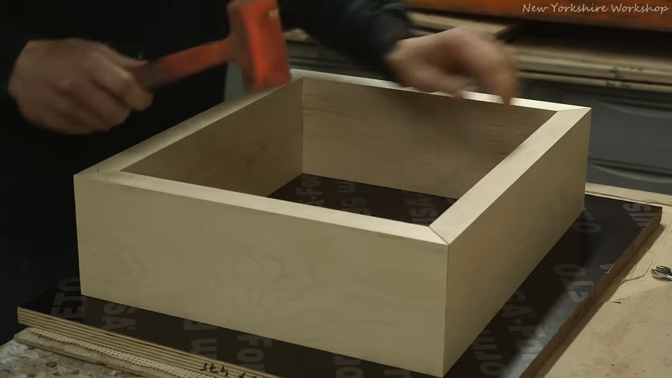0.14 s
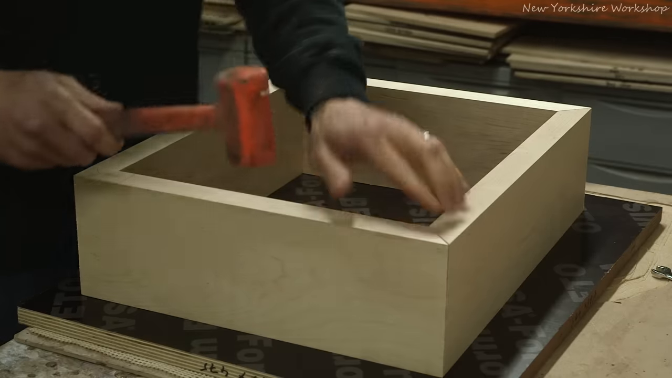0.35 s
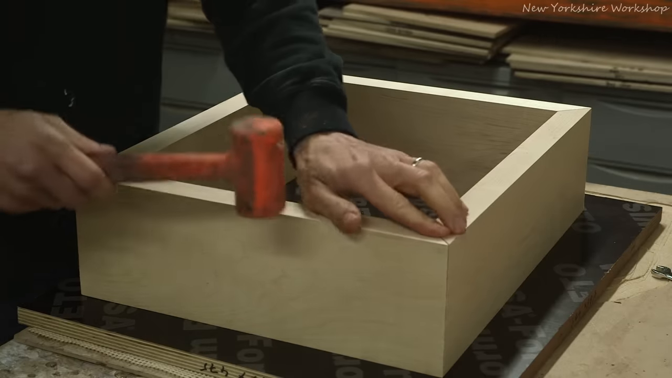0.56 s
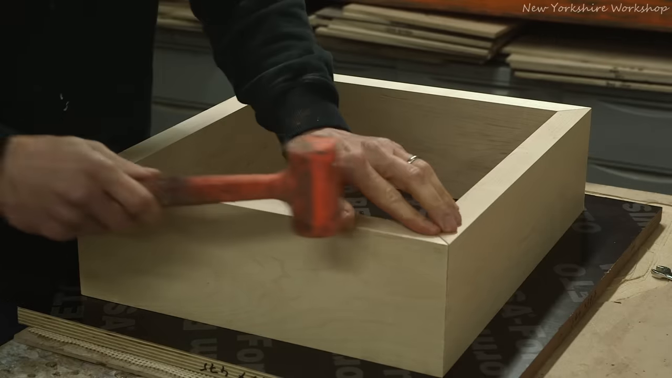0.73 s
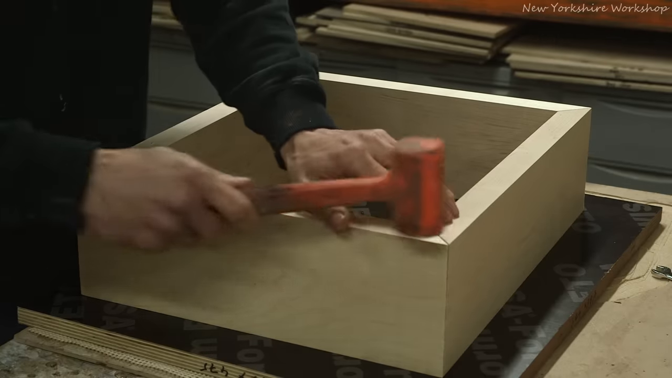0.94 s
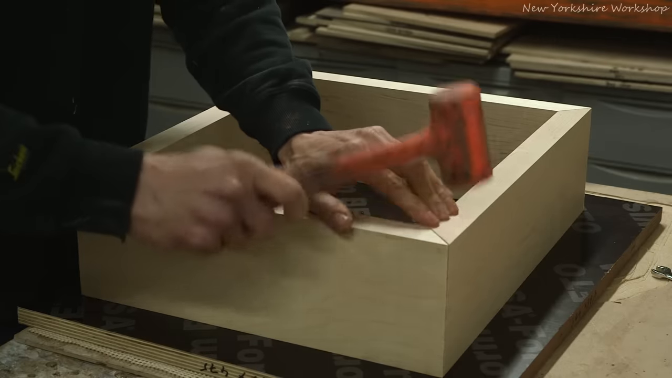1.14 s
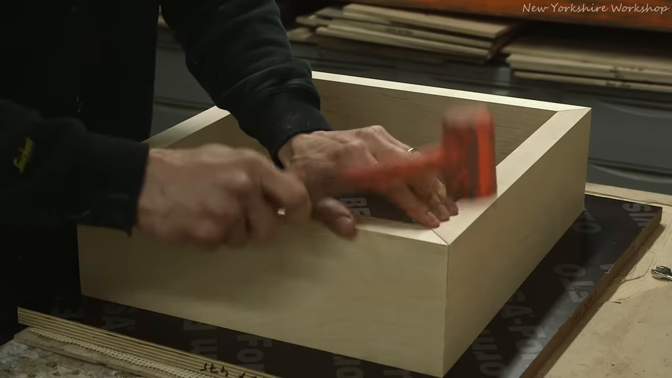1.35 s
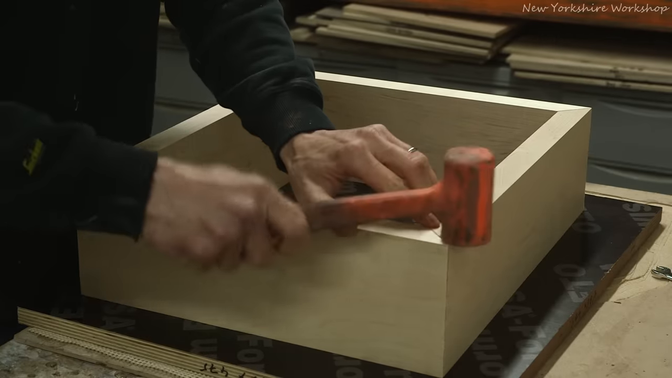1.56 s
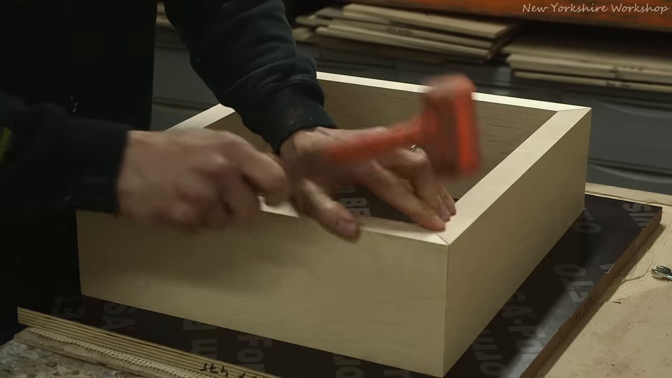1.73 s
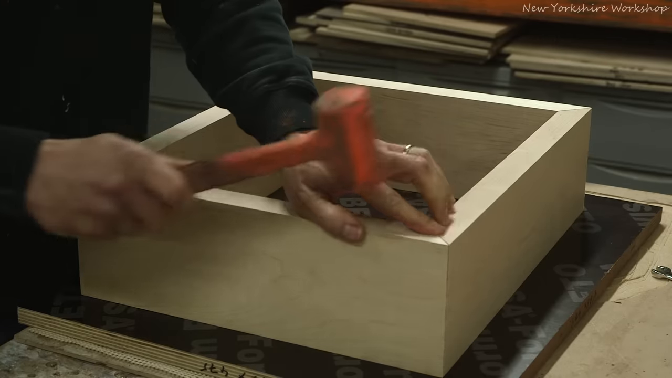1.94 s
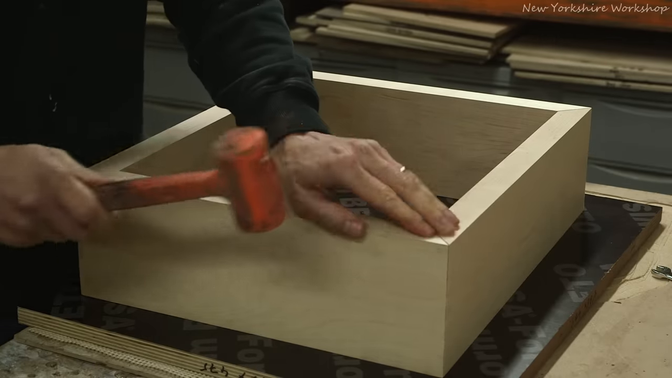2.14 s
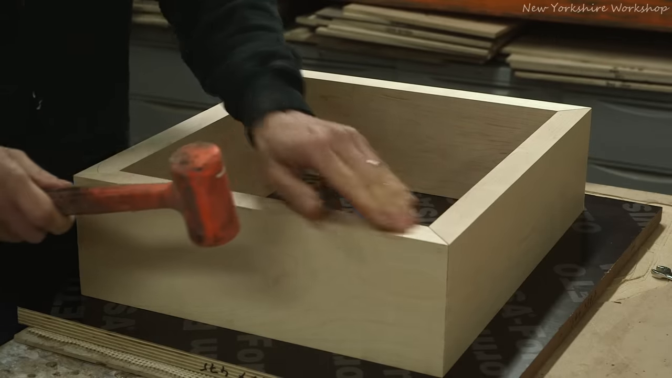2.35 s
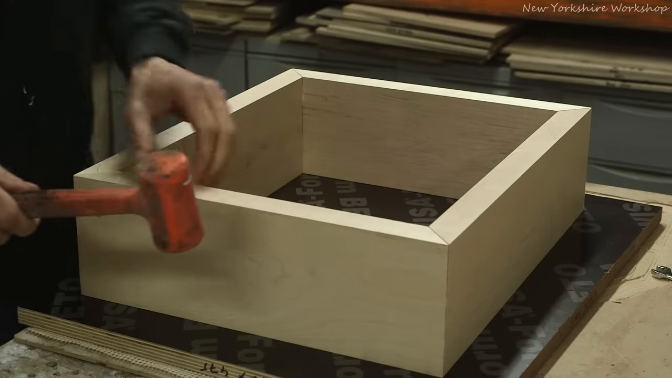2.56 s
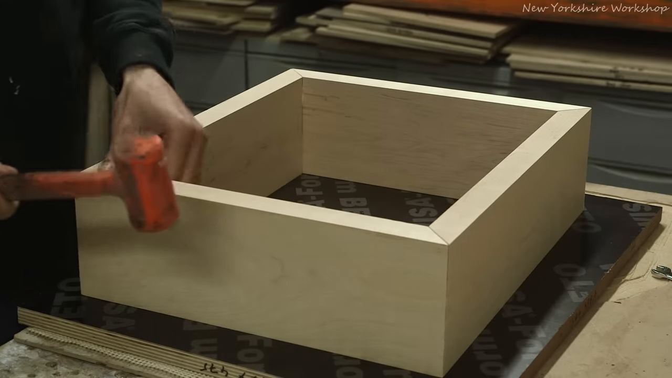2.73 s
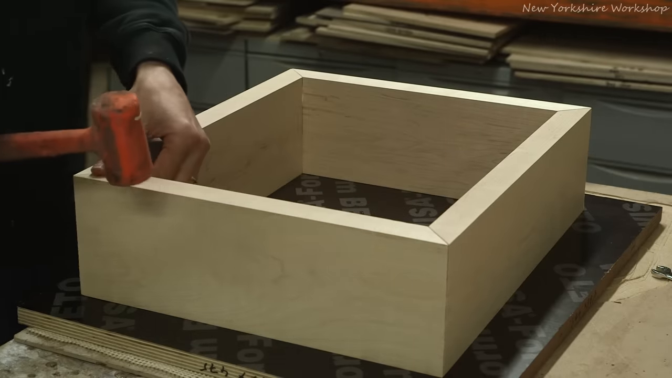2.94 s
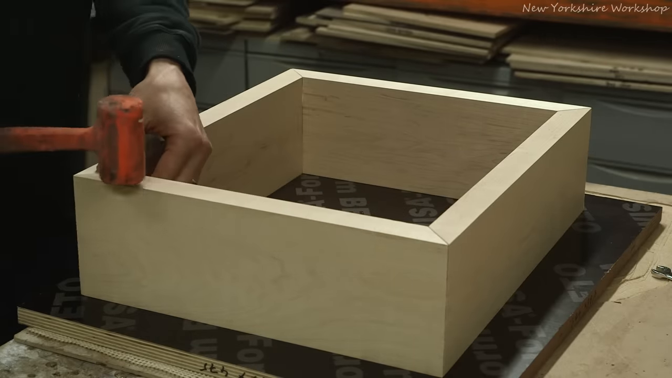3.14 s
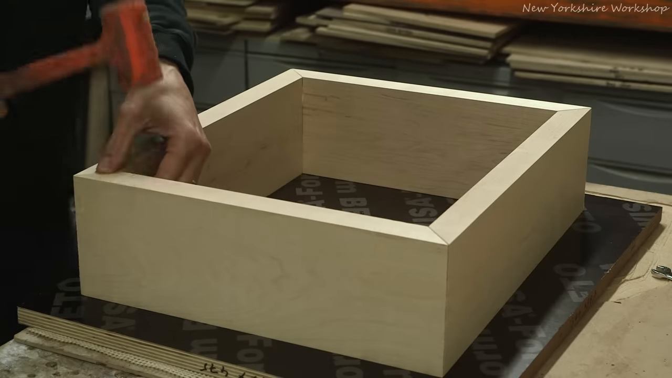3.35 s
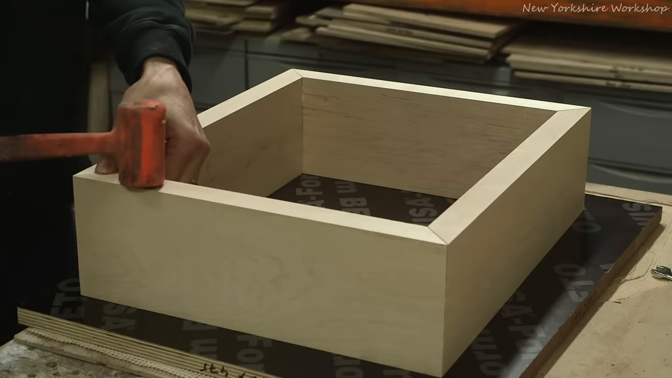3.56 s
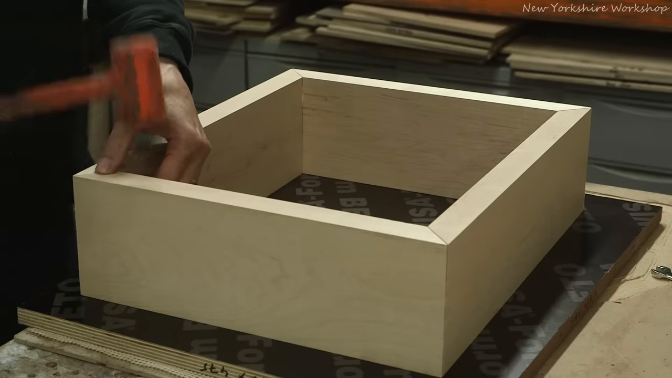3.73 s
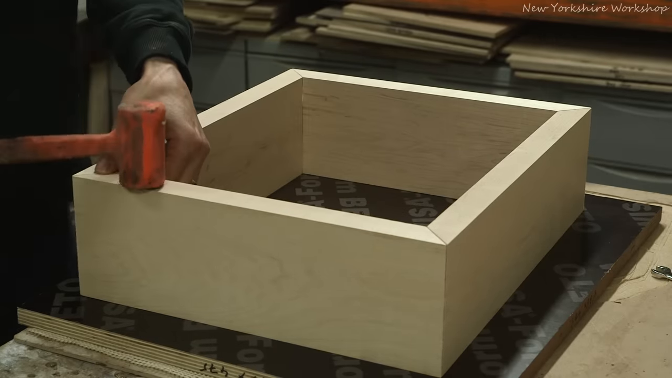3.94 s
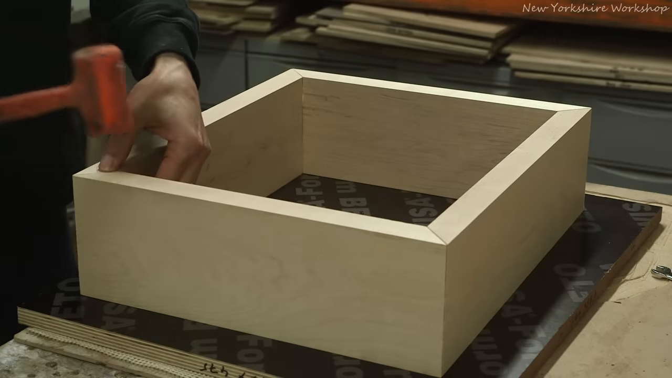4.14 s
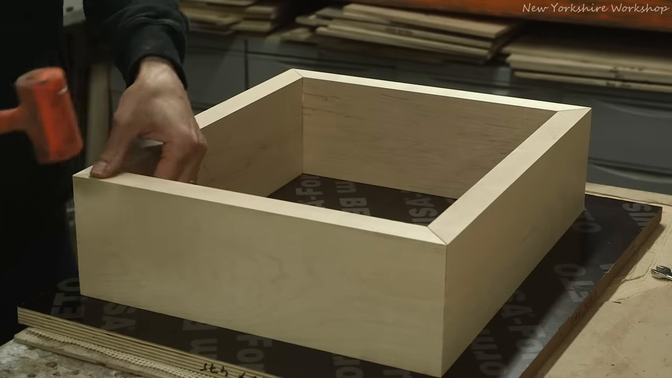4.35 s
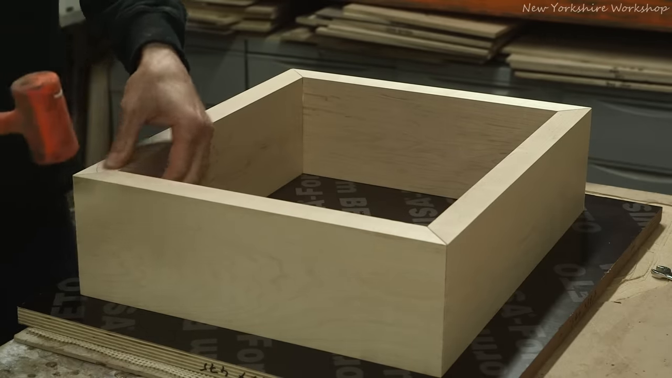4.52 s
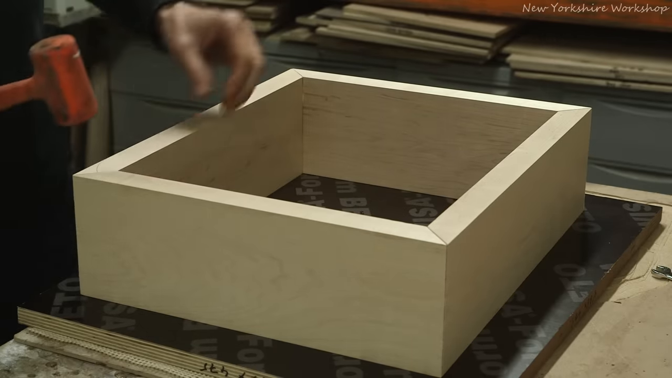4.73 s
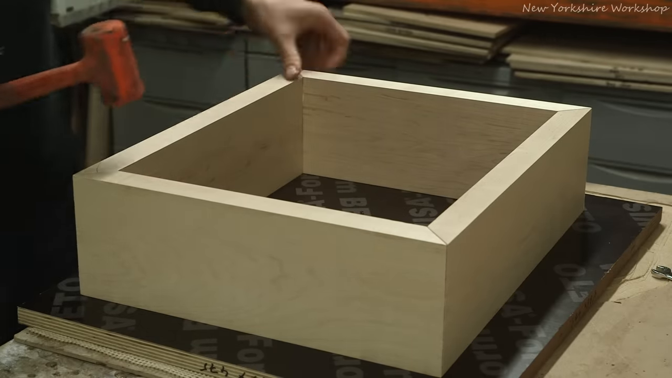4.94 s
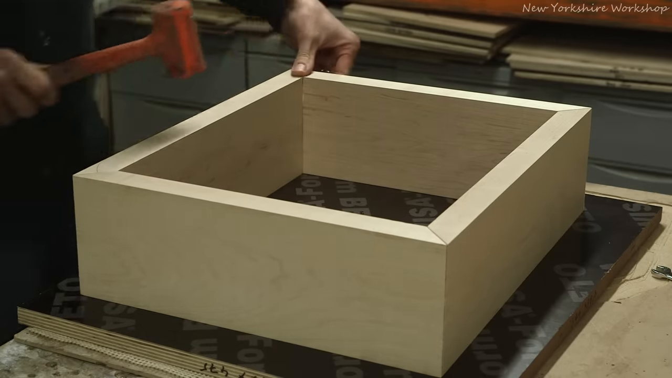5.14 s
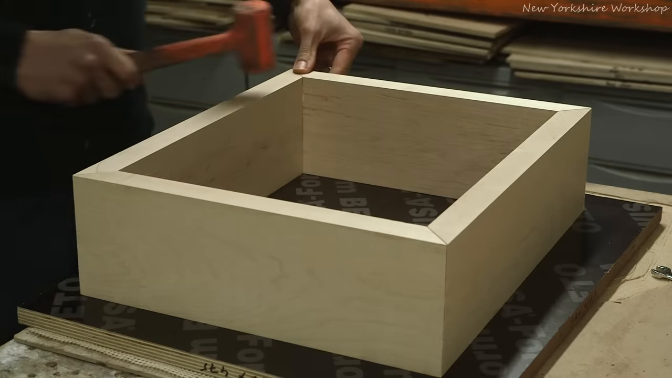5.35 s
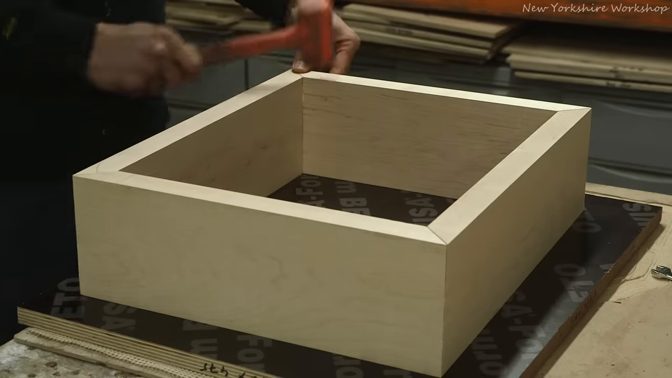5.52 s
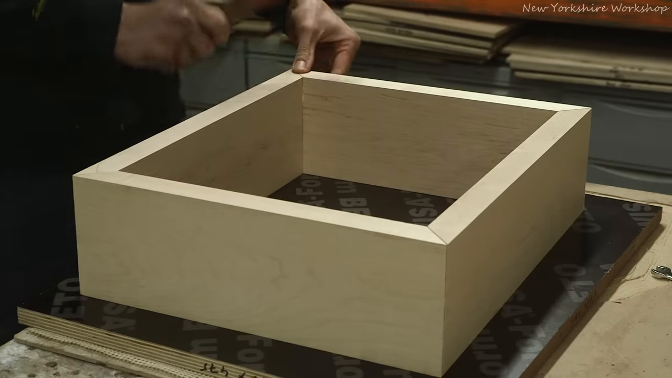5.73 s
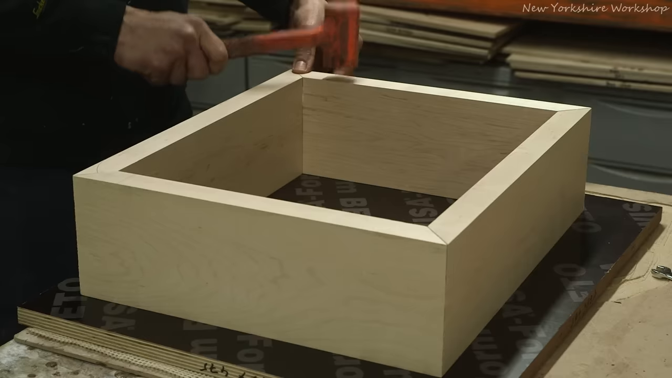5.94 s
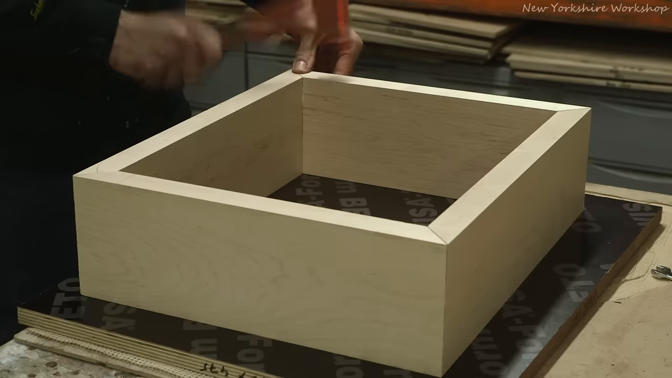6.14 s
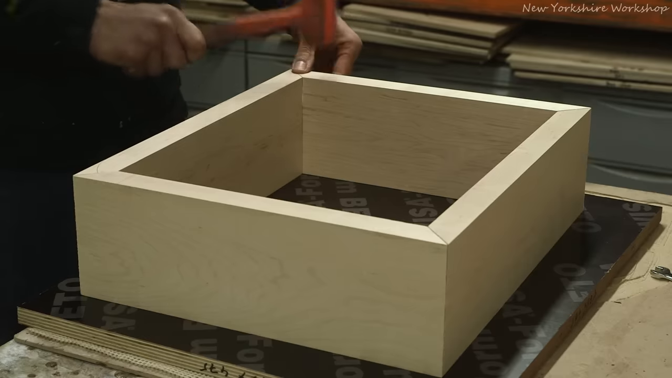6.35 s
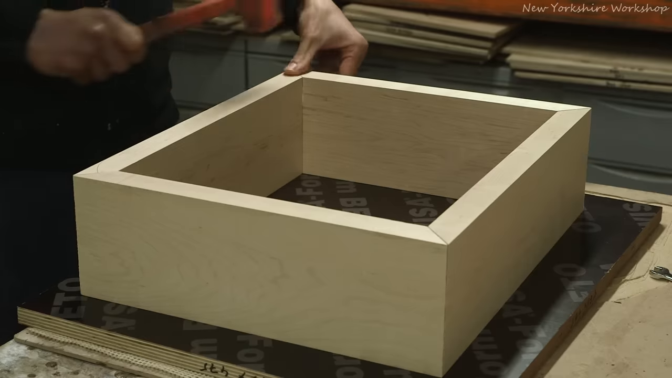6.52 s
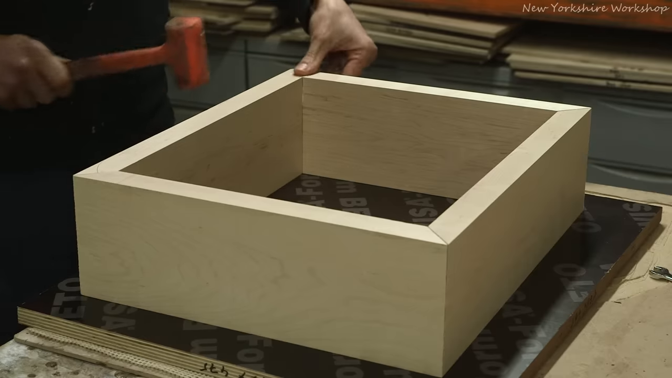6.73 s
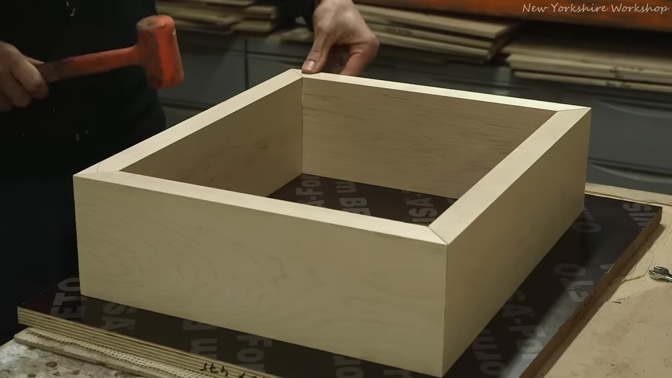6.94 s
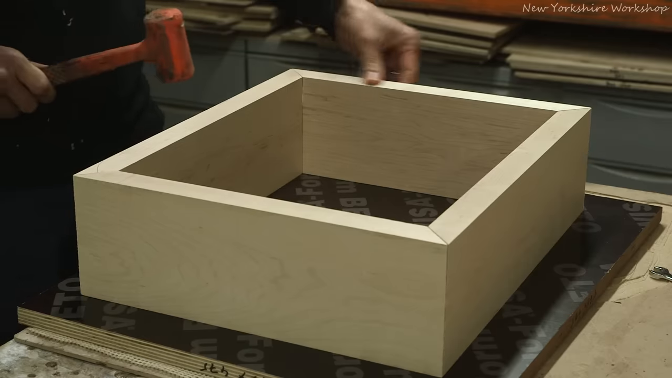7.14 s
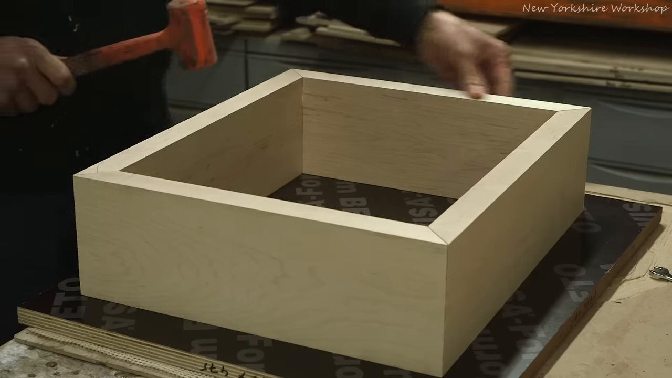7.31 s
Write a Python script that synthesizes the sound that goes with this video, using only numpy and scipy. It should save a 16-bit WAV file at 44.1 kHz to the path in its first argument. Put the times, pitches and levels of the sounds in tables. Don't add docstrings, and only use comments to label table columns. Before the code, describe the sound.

Close-up woodworking: faint cloth brushing and loose shot sliding in a mallet head, then two knocks on a wooden box, the first muted. Sleeves rustle and fingertips softly rub the edge before a second pair of hard knocks and, after another pause, a third. Each knock is brief, woody and hollow with a short indoor tail. It ends with light finger contact and fabric rubbing over quiet room tone and distant hum.

```python
import sys
import numpy as np
from scipy import signal
from scipy.fft import rfft, irfft
from scipy.io import wavfile
from scipy.ndimage import uniform_filter1d

SR = 44100
rng = np.random.default_rng(int(sys.argv[2]) if len(sys.argv) > 2 else 0)


def pcm_store(signal):
    levels = np.round(np.clip(np.atleast_2d(signal), -1, 1) * 32767)
    wavfile.write(sys.argv[1], SR, levels.astype(np.int16).T)


def gain_from_decibels(decibels):
    exponent = np.asarray(decibels, float) / 20
    return 10 ** exponent


N = 329861
TIME = np.arange(N) / SR
LEFT_RIGHT = np.array([[1], [-1]])


def along(table, hz, column=1):
    rows = np.array(table, float)
    return np.interp(np.log(np.maximum(hz, 1)), np.log(rows[:, 0]), rows[:, column])


def colour(x, table):
    log_gain = along(table, np.linspace(0, SR / 2, 2049)) * np.log(10) / 20
    cepstrum = irfft(log_gain)
    cepstrum[1:2048] *= 2
    cepstrum[2049:] = 0
    impulse = irfft(np.exp(rfft(cepstrum)))
    return signal.fftconvolve(x, impulse)[:len(x)]


def unit(x):
    return x / np.sqrt(np.mean(x ** 2))


def butter(order, hz, kind, x):
    return signal.sosfilt(signal.butter(order, hz, kind, fs=SR, output="sos"), x)


def ring(x, modes, widen=0.67):
    total = 0
    for k, (hz, width_hz, db) in enumerate(modes):
        q = hz / max(widen * width_hz, 3)
        total = total + (-1) ** k * gain_from_decibels(db) * signal.lfilter(*signal.iirpeak(hz, q, SR), x)
    return total


def envelope(strokes, sag_db_s=0):
    gain = np.zeros(N)
    for s, db, rise_s, hold_s, fall_s in strokes:
        away = np.maximum(s - TIME, 0) / rise_s + np.maximum(TIME - s - hold_s, 0) / fall_s
        gain += gain_from_decibels(db - 20 * away + sag_db_s * np.clip(TIME - s, 0, hold_s))
    return gain


def grains(rate_hz, spread_db):
    hit = rng.random(N) < rate_hz / SR
    return hit * rng.standard_normal(N) * gain_from_decibels(spread_db * rng.exponential(size=N))


def clatter(shape):
    x = rng.standard_normal(len(shape)) * shape
    for _ in range(8):
        lines = rfft(x)
        x = irfft(lines / (np.abs(lines) + 1e-12), len(shape))
        x *= shape / np.sqrt(np.abs(uniform_filter1d(x ** 2, size=40)) + 1e-12)
    return unit(x)


def workshop(x):
    # frequency in Hz, T60 in s, level in dB, side share.
    room = [(59.7, 0.63, 1, .05), (162, .65, 1, .05), (330, 0.46, 4, .06), (650, 0.48, 5, 0.12),
            (990, 0.48, 2.5, 0.31), (1960, .45, -1, 0.34), (3500, 0.42, -0.5, 0.47), (6070, 0.3, -0.5, .5),
            (8500, .26, 1.5, .5), (11700, 0.2, 0, .6)]
    late_db, late_stretch = -21.5, 1.9
    t, mid, side = TIME[:SR], 0, 0
    for hz in 45 * 2 ** np.arange(0, 8.6, .5):
        fall_db = 60 * t / along(room, hz)
        decay = gain_from_decibels(-fall_db) + gain_from_decibels(late_db - fall_db / late_stretch)
        fade = gain_from_decibels(along(room, hz, column=2)) * decay * np.clip(t / 0.0013, 0, 1)
        noise = butter(2, [hz / 2 ** .25, hz * 2 ** 0.28], "band", rng.standard_normal((2, SR))) * fade
        mid = mid + noise[0]
        side = side + noise[1] * along(room, hz, column=3)
    response = np.array([mid + side, mid - side]) / np.sqrt(SR * 0.049)
    return signal.fftconvolve(x[None], response, axes=1)[:, :N]


def air():
    # frequency in Hz, density in dB per Hz.
    tone = [(12, -20), (20, -5.5), (32, -16), (98, -4.5), (123, -15), (150, -7), (234, -9), (301, -9),
            (409, -14.5), (445, -20.5), (526, -13), (572, -15.5), (1570, -21), (1960, -27), (15900, -49.5)]
    # frequency in Hz, side minus mid in dB.
    tone_side = [(60, -18.5), (110, -12.5), (200, -12), (380, -15), (700, -8.5), (1290, -6.5), (2380, -3),
                 (4400, 2.5), (8120, -2), (15000, -1)]
    # frequency in Hz, width in Hz, level in dB.
    fan = [(286, 44, -68), (310, 17, -79.5), (306, 12, -84.5), (1500, 85, -81)]
    mid, side = colour(rng.standard_normal(N), tone), colour(rng.standard_normal(N), tone)
    gain = gain_from_decibels(-64.5 - 1.5) / np.std(mid)
    hum = 0
    for hz, width_hz, db in fan:
        hum = hum + gain_from_decibels(db) * unit(ring(rng.standard_normal(N), [(hz, width_hz, 0)]))
    return gain * (mid + colour(side, tone_side) * LEFT_RIGHT) + hum


def sleeves():
    # time of full level in s, level in dB, rise, hold and fall in s.
    brushes = [(0.10, -85, 0.064, 0.0079, .15), (0.42, -85, 0.077, .03, 0.067),
               (2.17, -84.5, .2, 0.0094, 0.044), (2.30, -77, .08, .01, 0.058), (2.39, -83, .06, .01, 0.035),
               (2.53, -81, .09, .01, 0.082), (4.55, -89, .08, .04, .02), (5.14, -81, .04, .02, .1),
               (7.08, -79.5, 0.27, 0.19, 0.24), (7.31, -79.5, 0.038, .09, 0.398)]
    # frequency in Hz, density in dB per Hz.
    cloth = [(1180, -45), (2000, 0.5), (4150, 0.5), (5770, 1), (7550, -3), (11300, -4), (15900, -16.5)]
    return unit(colour(grains(9000, 1.8), cloth)) * envelope(brushes) * gain_from_decibels(5.0)


def fingertips():
    # start in s, length in s, level in dB.
    rubs = [(2.703, .06, -88.5), (2.822, .07, -82.5), (2.946, .21, -87.5), (4.23, 0.1084, -84.5),
            (4.40, 0.16, -87.5), (5.11, 0.3, -88), (6.645, 0.214, -85)]
    # frequency in Hz, width in Hz, level in dB.
    veneer = [(2400, 88, 5.5), (3166, 240, 2.5), (4270, 110, -2), (5330, 140, 0.5), (6850, 220, -5),
              (10100, 2800, -16)]
    # start in s, peak in dB, frequency in Hz, width in Hz.
    taps = [(2.285, -63, 1200, 90.1), (3.238, -56.5, 170.7, 60.1), (5.038, -53, 200.5, 89.3),
            (5.045, -60, 405, 150), (5.060, -60, 1103, 250), (5.061, -54, 4190, 2500),
            (7.108, -55.5, 3300, 600), (7.109, -62, 6000, 3003)]
    attack_s, sag_db_s, release_s = 0.026, -12.5, .04
    strokes = [(s, db, attack_s, length_s, release_s) for s, length_s, db in rubs]
    skin = unit(ring(grains(12000, 1.03), veneer, widen=2.0)) * envelope(strokes, sag_db_s) * gain_from_decibels(12)
    t = TIME[:SR // 10]
    for s, peak_db, hz, width_hz in taps:
        at, decays = int(s * SR), np.pi * width_hz * t
        skin[at:at + len(t)] += gain_from_decibels(peak_db) * np.sin(2 * np.pi * hz * t) * decays * np.exp(1 - decays)
    return skin


def shot():
    # time of full level in s, level in dB, rise, hold and fall in s.
    slides = [(0.60, -72.5, 0.17, 0.097, 0.076), (0.755, -68, 0.052, 0.0084, 0.22),
              (3.30, -58, 0.12, 0.0081, .13), (5.46, -62, 0.16, 0.065, 0.21)]
    # frequency in Hz, density in dB per Hz.
    pellets = [(410, -34), (700, -7), (990, -16), (1100, -7.5), (1740, -9), (2110, -4.5), (2910, -5),
               (4920, -8), (15000, -37)]
    # start in s, peak in dB, centre in Hz, length in s.
    jumps = [
        (1.4829, -50, 3801, 0.0095),
        (3.447, -55.5, 4050, 0.016),
        (3.838, -48, 4263, 0.0069),
        (5.7464, -54, 4210, 0.011),
        (6.1156, -47, 4270, 0.012),
    ]
    pour = unit(colour(grains(3300, 1.9), pellets)) * envelope(slides) * gain_from_decibels(1.0)
    t = TIME[:SR // 10]
    for s, peak_db, hz, length_s in jumps:
        rattle = ring(rng.standard_normal(len(t)), [(hz, 2500, 0), (8300, 3000, -3), (13000, 5000, -8)])
        shape = (t / length_s) * np.exp(1 - (t / length_s) ** 1.6)
        at = int(s * SR)
        pour[at:at + len(t)] += gain_from_decibels(peak_db - 2.5) * rattle * shape
    return pour


def mallet():
    # start in s, peak in dB, bench thud in dB, clatter length in s,
    # hardness in dB of treble tilt.
    blows = [
        (1.206, -8, -27, 0.0065, -9),
        (1.5309, 0, -35.5, 0.0044, 0.6),
        (3.489, -2, -35, 0.007, -1.5),
        (3.881, 2.5, -40, 0.0036, 2.56),
        (5.7925, 3, -43, 0.0038, 1.16),
        (6.1651, 2.5, -49, 0.0047, 0.25),
    ]
    # frequency in Hz, width in Hz, level in dB.
    panels = [
        [(345, 35, 9), (600, 81, 5.5), (1120, 8.7, -9), (1442, 21, -8), (2120, 24, -14.5)],
        [(600, 57, -4), (880, 9.2, 5.5), (1120, 32, -1), (1720, 7.6, -10.5), (2840, 130, -10)],
        [(330, 16, 1), (383, 12, -5.5), (600, 35, -7.5), (1071, 9.7, -7.5), (1933, 30, -15.5), (3650, 40, -23)],
        [(307, 24, -4.5), (648.6, 17, 3.5), (1330, 22, -6.5), (2340, 44, -4.5), (3750, 130, -3.5)],
        [(583.2, 8, 0), (1501, 31, 0), (2100, 31, -4.5), (2330, 46, -16), (2910, 23, -12)],
        [(595, 18, -5.5), (1450, 14, 2), (1820, 13, -24.5), (2078, 16, -17.5), (3040, 25, -9.5)],
    ]
    # frequency in Hz, density in dB per Hz.
    corners = [
        [(50, -23), (207, -6), (447, -8), (600, -2.5), (1100, -6), (2140, -12), (3830, -22), (6500, -30.5),
         (15900, -73)],
        [(50, -32), (280, -9.5), (326, -2), (468, -10.5), (592, -2), (989, -6.5), (2600, -14.5), (6000, -34),
         (15900, -73.5)],
        [(50, -32.5), (322, -8.5), (560, -5), (860, -8.5), (1220, -5.5), (1440, -1), (2400, -12.5),
         (6500, -32.5), (15900, -67.5)],
    ]
    # frequency in Hz, width in Hz, level in dB.
    bench = [(76.5, 15, -3), (97, 10, -2.5), (141.7, 60, -4.5), (161, 23, -2.5), (215, 11, 4)]
    # frequency in Hz, width in Hz, level in dB.
    tools = [(178, 3.5, 2.5), (662, 6.3, -6), (964, 1.6, -3), (1460, 3.3, -4)]
    crack_db, crack_s, send_db, soft_hz = -21, .0008, -8, 880
    near, far, t = np.zeros((2, N)), np.zeros(N), TIME[:SR // 2]
    for k, ((s, peak_db, thud_db, length_s, hard_db), modes) in enumerate(zip(blows, panels)):
        body = [(hz, db + hard_db * max(np.log2(hz / soft_hz), 0) ** 0.27) for hz, db in corners[k // 2]]
        push = clatter((t / length_s) ** 0.3 * np.exp(-(t / length_s) ** 2.8))
        panel = unit(ring(push, modes, widen=1.7))
        wood = unit(colour(push, body))
        scale = gain_from_decibels(peak_db + 4.5) / np.abs(wood).max()
        snap = clatter((t / crack_s) * np.exp(-t / crack_s))
        crack = gain_from_decibels(crack_db + 1.8 * hard_db) * butter(2, [4500, 9000], "band", snap)
        thud = gain_from_decibels(thud_db + 15.5) * unit(ring(np.exp(-t / 0.001), bench))
        sound = scale * (butter(3, 170, "high", wood + gain_from_decibels(-6.5) * panel) + crack + thud)
        side = 0.2 * (np.roll(sound, 1) - np.roll(sound, -1))
        at = int(s * SR)
        near[:, at:at + len(t)] += sound + side * LEFT_RIGHT
        far[at:at + len(t)] += gain_from_decibels(send_db) * scale * (wood + gain_from_decibels(-11.5) * panel + gain_from_decibels(-3.0) * crack)
    return butter(3, 55, "high", near + workshop(far) + gain_from_decibels(2.5) * ring(far, tools))


def scene():
    small = shot() + fingertips() + sleeves()
    spread = .3 * (np.roll(small, 5) - np.roll(small, -4))
    return mallet() + small + spread * LEFT_RIGHT + gain_from_decibels(-11.0) * workshop(small) + air()


def roll_off(x):
    return signal.sosfilt(signal.butter(12, 16080, fs=SR, output="sos"), x)


def record(dry):
    rounded = 1.56 * np.tanh(dry / 1.895)
    rounded = signal.lfilter(*signal.butter(1, 45, "high", fs=SR), rounded)
    return roll_off(np.clip(rounded + .0005, -1, 1))


dry = scene()
out = record(dry)
pcm_store(out)
```